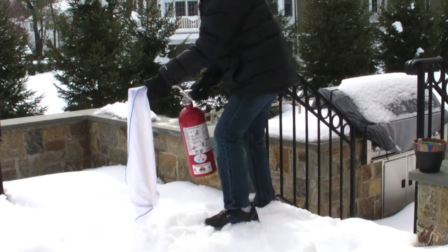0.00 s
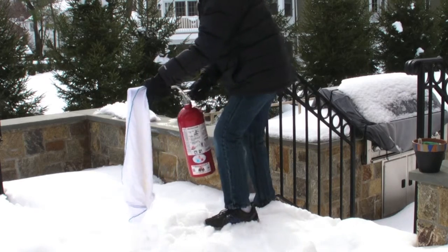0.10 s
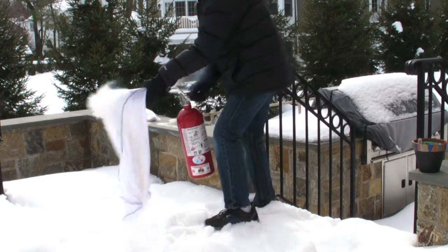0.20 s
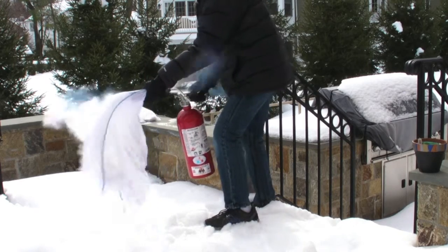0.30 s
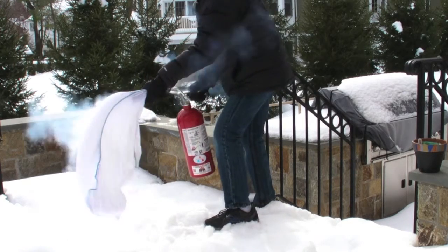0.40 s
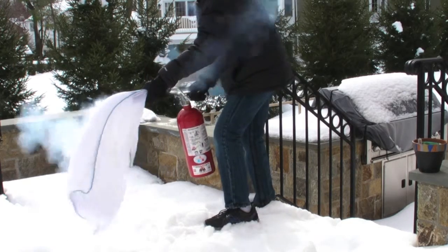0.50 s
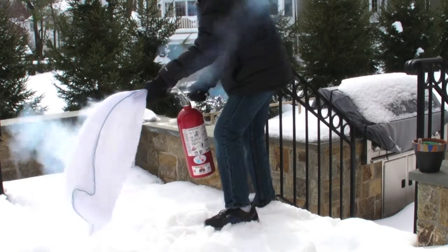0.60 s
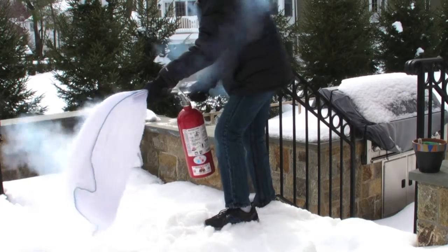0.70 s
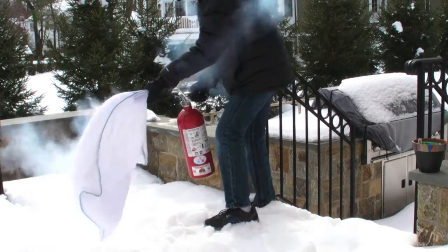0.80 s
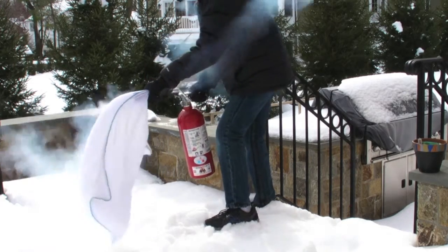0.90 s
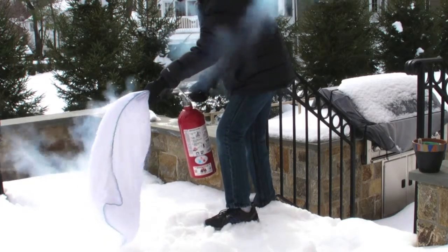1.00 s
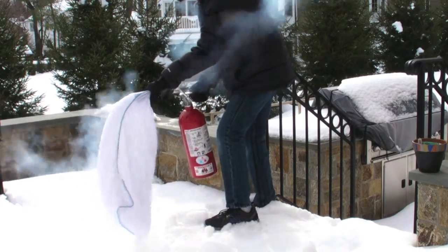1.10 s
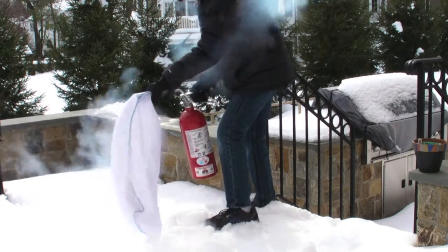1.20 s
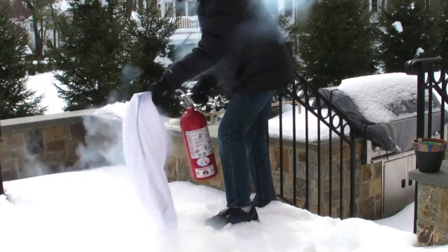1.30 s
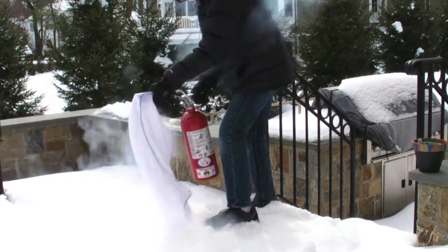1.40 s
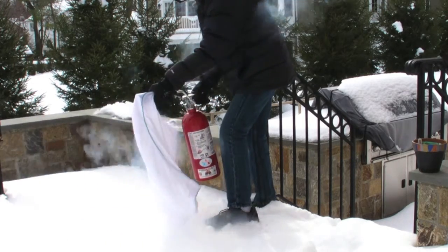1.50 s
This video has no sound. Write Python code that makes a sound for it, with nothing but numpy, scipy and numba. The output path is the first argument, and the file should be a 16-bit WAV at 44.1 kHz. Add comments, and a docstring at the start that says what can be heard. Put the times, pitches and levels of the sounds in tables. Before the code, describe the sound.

A fire extinguisher blasts once into a cloth bag outdoors, a few metres away. After a moment of faint low rumble, the valve opens with a sharp spit at 0.2 seconds. A loud hiss with a hollow, fluttering roar holds, easing slightly, and cuts off at 1.3 seconds. A short echo fades while the slack bag sighs softly until about 1.6 seconds, with a few faint cloth ticks.

```python
"""Extinguisher blast into a bag

A gas extinguisher is fired once into a cloth bag on a snowy terrace, a few metres away.
The valve spits, the jet hisses, horn and bag roar in their resonances; a house front echoes the blast
and the slack bag sighs over a low outdoor rumble. The microphone adds a bright peak and gain control."""
import sys
import numpy as np
from scipy import signal
from scipy.fft import rfft, irfft
from scipy.io import wavfile
from scipy.ndimage import uniform_filter1d
from numba import njit

SR = 44100
rng = np.random.default_rng(int(sys.argv[2]) if len(sys.argv) > 2 else 0)


def generate_wav(sig):
    """Save sig (samples, or channels by samples) to the path in sys.argv[1] as 16-bit PCM at SR."""
    pcm = np.round(np.clip(np.atleast_2d(sig).T, -1, 1) * 32767).astype(np.int16)
    wavfile.write(sys.argv[1], SR, pcm)


N = 70560


def undb(db):
    return 10 ** (np.asarray(db) / 20)


def set_rms(x, db):
    return x * undb(db) / np.sqrt(np.mean(x ** 2))


def at_hz(table, hz):
    """Read a curve on a log-frequency axis."""
    table = np.array(table, float)
    return np.interp(np.log(hz), np.log(table[:, 0]), table[:, 1])


def bump(t, peak_s, spread_s):
    return np.exp(-.5 * ((t - peak_s) / spread_s) ** 2)


def gate(t, start, rise_s, stop, fall_db_per_s):
    """Attack, hold and exponential release."""
    return np.clip((t - start) / rise_s, 0, 1) ** 1.4 * undb(-fall_db_per_s * np.clip(t - stop, 0, None))


def wobble(rate_hz):
    """Smoothed random steps with a spread near 1."""
    hold = int(SR / rate_hz)
    steps = np.repeat(rng.standard_normal(N // hold + 1), hold)
    return 1.46 * uniform_filter1d(uniform_filter1d(steps, hold), hold)[:N]


@njit
def bandpass(x, hz, width):
    """State-variable filter with unity gain at its moving centre."""
    y, band_state, low_state = np.empty(len(x)), 0., 0.
    for i in range(len(x)):
        g, damping = np.tan(np.pi * hz[i] / SR), width / hz[i]
        v = (band_state + g * (x[i] - low_state)) / (1 + g * (g + damping))
        band_state, low_state = 2 * v - band_state, low_state + 2 * g * v
        y[i] = damping * v
    return y


def noise_band(hz, width, side_curve, pan_db=0., drift=0.):
    """Steep stereo noise band: a mid of rms 1 plus an unrelated side."""
    centre = hz * (1 + drift * wobble(4.32))
    noises = rng.standard_normal((2, N))
    for _ in range(2):
        noises = [bandpass(x, centre, 1.55 * width) for x in noises]
    mid, side = (set_rms(x, 0) for x in noises)
    sign = np.array([[1], [-1]])
    return (mid + undb(at_hz(side_curve, hz)) * side * sign) * undb(sign * pan_db / 2)


# Tone of the outdoor bed: f/Hz, relative density/dB
BED_TONE = [(25, -21), (50, -2.5), (90, 5), (130, -13), (175, -46), (210, -14), (300, -22.5), (600, -21.5),
            (1000, -27.5), (1700, -33.5), (6000, -38.5)]
# Stereo width of the bed: f/Hz, side minus mid/dB
BED_WIDTH = [(60, -24), (110, -16), (200, -8), (370, -7), (690, -6), (1260, -1), (2320, -2), (4260, 1),
             (7830, 4), (14400, -4)]
# Swells in the low end: t/s, gain/dB
RUMBLE_SWELLS = [(0, 1), (.03, 2), (.12, -3.5), (.18, 0.5), (.3, -2), (.57, 0.5), (1.05, 2), (1.3, -3),
                 (1.45, 0), (1.56, 3.5), (1.6, 2)]

def outdoors(t):
    """A bed of low rumble in flickering half-octave bands, with faint air on top."""
    bed, swell_db = 0, np.interp(t, *np.array(RUMBLE_SWELLS).T)
    for hz in 30 * 2 ** (np.arange(16) / 2):
        db = at_hz(BED_TONE, hz) + 10 * np.log10(hz) + 1.2 * wobble(14.9) + (hz < 150) * swell_db
        bed += undb(db) * noise_band(hz, hz / 3, BED_WIDTH)
    air = undb(-65 + 2 * wobble(12)) * noise_band(11200, 12000, BED_WIDTH)
    return set_rms(bed, db=-36.5) + air


def yard_echo(blast, t, t60_s=0.87):
    """A scattered tail from the yard and a smeared slap off a house front, both slightly dulled."""
    tail = set_rms(undb(-60 * t / t60_s), db=-22.5)
    slap = set_rms(bump(t, peak_s=0.27, spread_s=0.052), db=-37.5)
    response = (tail + slap) / np.sqrt(N) * rng.standard_normal((2, N))
    wet = signal.fftconvolve(blast.mean(axis=0)[None], response, axes=1)[:, :N]
    return signal.lfilter(*signal.butter(1, 9100, fs=SR), wet)


# Stereo width of bag and extinguisher: f/Hz, side minus mid/dB
SOURCE_WIDTH = [(60, -16), (200, -16.5), (370, -14), (690, -9.5), (1260, -4.5), (2320, -5), (4260, -3),
                (6200, -0.5), (8700, -7.5), (11000, 1), (14400, -3.5)]
# Faint bright ticks: t/s, level/dB
BRIGHT_TICKS = [(.156, -55), (1.413, -48), (1.571, -52)]

def rustle_and_ticks(t):
    """A bright rustle sounds before the blast, and a few faint ticks."""
    rustle = undb(-63.5 + 3 * wobble(57)) * bump(t, peak_s=.045, spread_s=.035)
    ticks = sum(undb(db) * np.exp(-np.abs(t - when) / 0.0022) for when, db in BRIGHT_TICKS)
    return (rustle + ticks) * noise_band(7900, 4000, SOURCE_WIDTH)


# Fader curve of the sigh: t/s, gain/dB
SIGH_FADER = [(1.25, -54), (1.36, -38.5), (1.42, -38.5), (1.49, -37.5), (1.54, -43), (1.6, -50)]
# Colour of the escaping gas: f/Hz, bandwidth/Hz, relative level/dB
SIGH_COLOUR = [(283, 81, -4.5), (530, 280, -3), (660, 140, -2), (1200, 940, 0), (2800, 4600, -7.5),
               (8950, 7000, -14), (12400, 4000, -14)]

def bag_sigh(t):
    """Gas leaves the collapsing bag in a soft, broad rush."""
    rush = sum(undb(db + 1.7 * wobble(20)) * noise_band(hz, width, SOURCE_WIDTH)
               for hz, width, db in SIGH_COLOUR)
    return undb(np.interp(t, *np.array(SIGH_FADER).T)) * (t > SIGH_FADER[0][0]) * rush


# Phase lag of the right microphone port: f/Hz, lag/rad
PORT_LAG = [(1500, 0), (3000, .5), (5000, 1.3), (7000, .6), (8600, .3), (10000, -.2), (11500, 1.2),
            (14500, 2.8)]

def bounce_and_ports(blast):
    """The blast arrives direct and off the paving; the two microphone ports differ in phase."""
    hz = np.arange(N // 2 + 1) * SR / N + 1e-9
    delay_s, bounce_db = np.array([[.00305], [.00295]]), [[-12], [-8]]  # left, right
    bounce = undb(bounce_db) * np.exp(-2j * np.pi * hz * delay_s) / (1 + 1j * hz / 9000)
    spectrum = rfft(blast) + bounce * rfft(blast.mean(axis=0))
    spectrum[1] *= np.exp(-1j * at_hz(PORT_LAG, hz))
    return irfft(spectrum, N)


VALVE_OPEN_S, VALVE_SHUT_S = 0.2096, 1.293
# Ring of the empty horn: f/Hz, bandwidth/Hz, relative level/dB
HORN_RING = [(1390, 350, -2), (2800, 400, -4), (3750, 300, 1), (4500, 400, -5)]

def valve_spit(t):
    """The first spit of gas rings the horn before the flow settles."""
    burst = bump(t, peak_s=.2215, spread_s=.0048) * np.clip((t - VALVE_OPEN_S) / .003, 0, 1)
    ring = sum(undb(db) * noise_band(hz, width, SOURCE_WIDTH) for hz, width, db in HORN_RING)
    return undb(-10) * burst * ring


# Panning of roar and jet: f/Hz, left minus right/dB
BLAST_PAN = [(60, 0.0), (110, 2), (200, 3), (370, 0.5), (690, 2.5), (1260, 0), (2320, 2.5), (4260, -0.5),
             (7830, 2), (14400, -5)]
# Resonances of horn and filled bag: f/Hz, bandwidth/Hz, relative density/dB
ROAR_RESONANCES = [(189.3, 22, -18), (252.7, 38.2, -5.5), (354.3, 49, -12.5), (438.4, 56, -12.5),
                   (576, 70, -9.5), (715.5, 96.6, -4), (934, 128, -7), (1195, 62, -9.5), (1345, 115, -8.5),
                   (1553, 227, -10), (1994, 68, -16.5), (2304, 190, -12), (2930, 294, -15),
                   (3690, 40, -13.5)]
# Puffs in the strongest resonance: t/s, boost/dB, spread/s
ROAR_PUFFS = [(.385, 3, .015), (.578, 3, .015), (.774, 4.5, .01), (1.17, 2, .07)]

def bag_roar(t, fill_s=0.2486, slack_s=1.2587):
    """Horn and bag resonate while the bag is full, each resonance fluttering on its own."""
    roar = 0
    puff_db = sum(db * bump(t, when, spread) for when, db, spread in ROAR_PUFFS)
    for hz, width, db in ROAR_RESONANCES:
        gain_db = db + 10 * np.log10(width / 100) + wobble(22.04) + (640 < hz < 800) * puff_db
        stop = slack_s + 0.0063 * np.log2(hz / 700)  # low resonances die first
        flow = gate(t, fill_s, rise_s=0.038, stop=stop, fall_db_per_s=282)
        resonance = noise_band(hz, width, SOURCE_WIDTH, at_hz(BLAST_PAN, hz), drift=0.0141)
        roar += flow * undb(gain_db) * resonance
    return undb(-9.5) * roar


# Tone of the gas jet: f/Hz, relative density/dB
JET_TONE = [(150, -29), (400, -1.5), (1000, 1), (2500, 1.5), (4500, -0.5), (6500, -5), (10000, -7),
            (12000, -15.5), (14500, 0.5)]
# Bright bite as the valve opens: f/Hz, boost/dB
OPENING_SURGE = [(400, -2), (1200, 1.5), (3000, 0), (5500, 4), (9000, 10.5), (14000, 6)]
# Fade as the pressure falls: f/Hz, loss/(dB/s)
PRESSURE_SAG = [(500, 5), (4000, 4.5), (9000, 2), (13000, 0)]

def jet_hiss(t, rise_s=0.017, surge_decay_s=0.023):
    """Turbulent gas hisses in third-octave bands, surging at first and sagging with the pressure."""
    hiss, swell_db = 0, 0.36 * wobble(5.2)
    closing_db = bump(t, VALVE_SHUT_S, spread_s=0.015)  # a small lift as the valve narrows
    centres = 160 * 2 ** (np.arange(20) / 3)
    band_db = at_hz(JET_TONE, centres) + 10 * np.log10(centres)
    band_db -= 10 * np.log10(np.sum(undb(2 * band_db)))  # band powers sum to 1
    for hz, db in zip(centres, band_db):
        start = VALVE_OPEN_S + .0035 * np.log10(hz / 1000)  # the treble opens last
        held_s = np.clip(t - start - rise_s, 0, None)
        surge_db = at_hz(OPENING_SURGE, hz) * np.exp(-held_s / surge_decay_s)
        sag_db = at_hz(PRESSURE_SAG, hz) * held_s
        gain_db = db + surge_db - sag_db + swell_db + 1.17 * wobble(15.22) + closing_db
        flow = gate(t, start, rise_s, VALVE_SHUT_S, fall_db_per_s=362)
        hiss += flow * undb(gain_db) * noise_band(hz, hz / 4, SOURCE_WIDTH, at_hz(BLAST_PAN, hz))
    return undb(-9.5) * hiss


def scene():
    t = np.arange(N) / SR
    blast = jet_hiss(t) + valve_spit(t) + bag_roar(t)
    return bounce_and_ports(blast) + bag_sigh(t) + rustle_and_ticks(t) + yard_echo(blast, t) + outdoors(t)


@njit
def follow(x, attack_s, release_s):
    """Envelope follower for the gain control."""
    y, envelope = np.empty(len(x)), 1e-4
    for i in range(len(x)):
        envelope += (x[i] - envelope) / (SR * (attack_s if x[i] > envelope else release_s))
        y[i] = envelope
    return y


def record(dry, peak_hz=9000., peak_db=13.5, threshold_db=-34, ratio=1.427):
    """Microphone chain: bright peak, gain control, hard clip, steep high cut."""
    peak = np.array([bandpass(channel, np.full(N, peak_hz), width=1690.) for channel in dry])
    bright = dry + (undb(peak_db) - 1) * peak
    envelope = follow(np.abs(bright).mean(axis=0), attack_s=0.016, release_s=0.078)
    gain = np.minimum(1, undb(threshold_db) / envelope) ** (1 - 1 / ratio)
    high_cut = signal.ellip(10, .2, 70, 14900, fs=SR, output="sos")
    return np.clip(signal.sosfilt(high_cut, np.clip(bright * gain, -1, 1)), -1, 1)


dry = scene()
out = record(dry)
generate_wav(out)
```